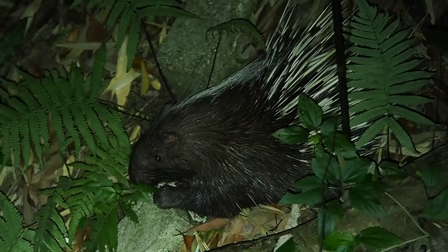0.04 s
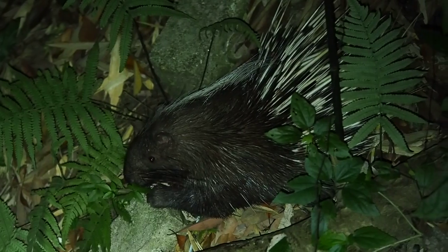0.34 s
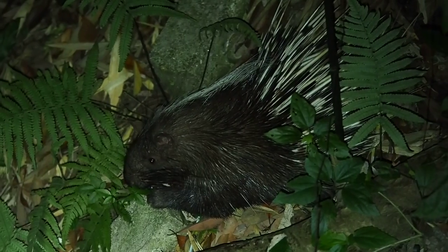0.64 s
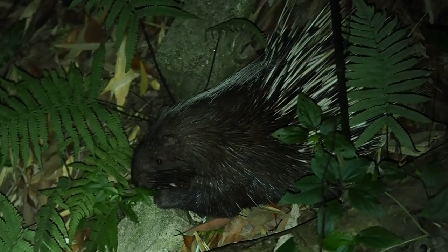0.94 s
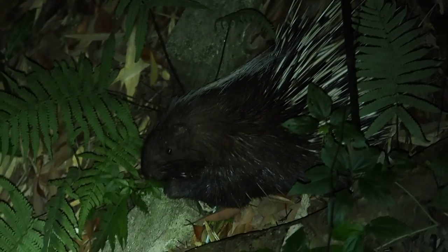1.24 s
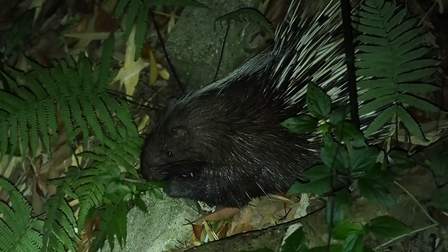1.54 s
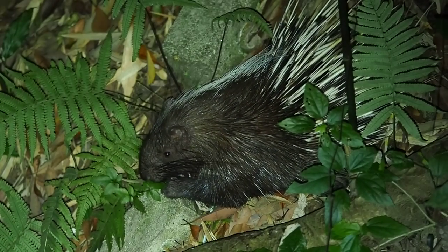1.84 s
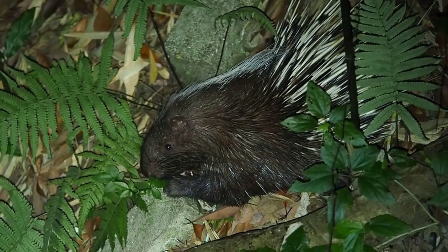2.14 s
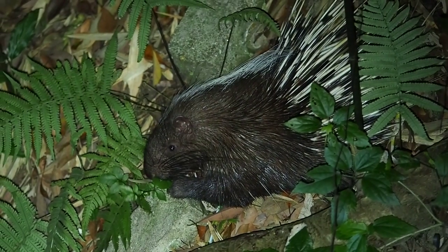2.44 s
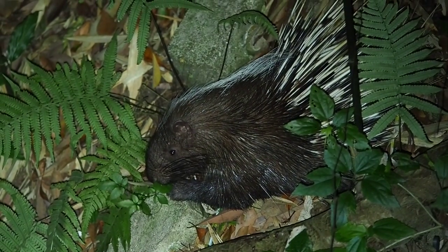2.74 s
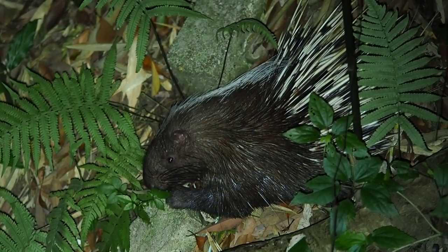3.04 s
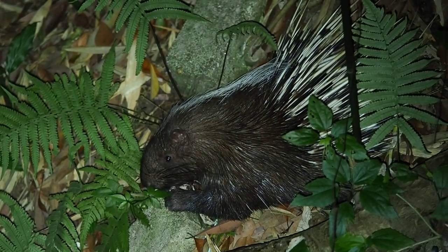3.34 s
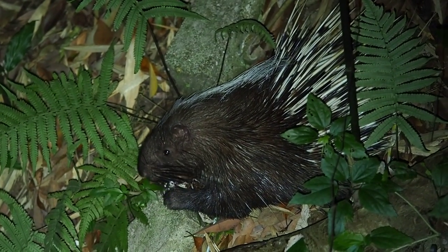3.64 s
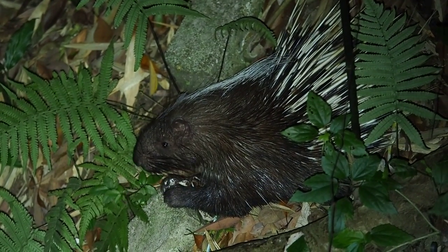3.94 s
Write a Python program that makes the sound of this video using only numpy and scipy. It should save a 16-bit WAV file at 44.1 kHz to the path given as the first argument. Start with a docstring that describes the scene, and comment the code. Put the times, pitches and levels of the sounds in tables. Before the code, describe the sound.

Faint crickets chirp throughout in a quiet night forest, over microphone hiss and a low distant rumble that fade in by half a second. A bush cricket rasps briefly at the start and again from about 2.3 to 3 seconds. At 1.6 seconds a porcupine feeding nearby makes one small dry snap. From around 2.5 seconds a thin insect trill rises and a far breeze swells softly.

```python
"""A low far-off rumble and a soft rush fade in over microphone hiss: a quiet forest at night.
A bush cricket rasps twice in quick scraping strokes above a thin insect chorus and one far trill.
Crickets chirp with pulsed wing strokes that echo off trunks and leaves.
One small dry snap, a few briefly ringing modes, comes from a porcupine feeding close by."""
import sys
import numpy as np
from scipy import signal
from scipy.fft import rfft, irfft
from scipy.io import wavfile

SR = 44100
rng = np.random.default_rng(int(sys.argv[2]) if len(sys.argv) > 2 else 0)


def to_wav(sig):
    """Store sig (one row per channel, or 1-D mono) as 16-bit WAV at the path in sys.argv[1].

    Samples outside -1..1 are clipped; the rate is SR.
    """
    pcm = np.clip(np.atleast_2d(sig), -1, 1) * 32767
    pcm = np.round(pcm).astype(np.int16)
    wavfile.write(sys.argv[1], SR, pcm.T)  # frames by channels


N = 176400
TIME = np.arange(N) / SR
FREQ = np.fft.rfftfreq(N, 1 / SR)


def amp(db):
    """Decibels to gain."""
    return 10 ** (np.asarray(db) / 20)


def unit(x):
    """Scale to rms 1."""
    return x / np.sqrt(np.mean(x ** 2) + 1e-30)


def spectrum(points):
    """Interpolate (frequency [Hz], value) on a log-frequency axis."""
    hz, value = np.transpose(points)
    return np.interp(np.log(FREQ + 1), np.log(hz + 1), value)


def envelope(points):
    """Gain over time from (time [s], level [dB])."""
    return amp(np.interp(TIME, *np.transpose(points)))


def drift(rate_hz):
    """Random wander below rate_hz, rms 1."""
    return unit(irfft(rfft(rng.standard_normal(N)) / (1 + (FREQ / rate_hz) ** 4), N))


def pan(right_db):
    """Stereo gains from right minus left level."""
    return amp(np.array([[-.5], [.5]]) * right_db)


def noise(shape, corr, right_db):
    """Shaped stereo noise with left-right correlation corr; rms 1 before panning."""
    left, independent = rfft(rng.standard_normal((2, N)))
    corr = np.clip(corr, -.99, .99)
    right = corr * left + np.sqrt(1 - corr ** 2) * independent
    return pan(right_db) * unit(irfft(np.array([left, right]) * shape, N))


def tones(rows, corr, right_db):
    """Wavering tones: narrow noise bands from (centre [Hz], width [Hz], level [dB])."""
    return sum(amp(db) * noise(1 / (1 + ((FREQ - hz) / width_hz) ** 2) ** 1.2, corr, right_db)
               for hz, width_hz, db in rows)


def add(mix, start_s, sound):
    """Mix in a stereo sound at start_s."""
    part = mix[:, max(round(start_s * SR), 0):][:, :sound.shape[1]]
    part += sound[:, :part.shape[1]]


def far_rumble():
    """Low noise, near mono in the bass, with a deep swell late on."""
    # (frequency [Hz], relative density [dB])
    rumble_spectrum = [(20, -15.5), (45, -8.5), (65, -7), (80, -0.5), (125, -4), (165, -2.5), (230, .5),
                       (295, -2), (360, 1), (420, -4), (570, -10), (800, -18), (2000, -32.5)]
    swell_spectrum = [(50, -20), (100, -2), (130, 0.5), (200, -0.5), (260, 1), (400, -4), (700, -40)]
    # (time [s], level [dB])
    swell_level = [(2.3, -80), (2.75, -70), (3.2, -65), (3.55, -74), (3.8, -68), (4, -62)]
    # (frequency [Hz], left-right correlation)
    correlation = [(30, 1), (100, 0.9), (200, 0.58), (340, .05), (500, 0.41), (900, 0.19)]
    corr = spectrum(correlation)
    steady = amp(-60 + .5 * drift(19)) * noise(amp(spectrum(rumble_spectrum)), corr, right_db=1.4)
    return steady + envelope(swell_level) * noise(amp(spectrum(swell_spectrum)), corr, right_db=0)


def far_rush():
    """Soft midrange noise with a brighter, fluttering swell, as of a far breeze."""
    # (frequency [Hz], relative density [dB])
    rush_spectrum = [(300, -8.5), (570, -5.5), (690, 2.5), (950, -0.5), (1250, -1), (1450, -4), (1700, -7),
                     (2050, -19.5), (3000, -18.5), (6000, -34)]
    swell_spectrum = [(500, -8), (850, -4), (1050, 6.5), (1300, -2.5), (1500, -10), (1750, 2),
                      (2050, -17.5), (2700, -7), (4000, -37.5)]
    # (time [s], level [dB])
    swell_level = [(2.4, -80), (2.85, -71), (3.12, -65), (3.4, -69), (3.6, -77), (3.85, -68.5), (4, -74)]
    steady = amp(-66 + .51 * drift(4.2)) * noise(amp(spectrum(rush_spectrum)), corr=.66, right_db=2.4)
    swell_gain = envelope(swell_level) * amp(1.4 * drift(27))
    return steady + swell_gain * noise(amp(spectrum(swell_spectrum)), corr=.75, right_db=-1)


def microphone_hiss():
    """Even, wide hiss, a little louder on the right."""
    # (frequency [Hz], relative density [dB])
    hiss_spectrum = [(500, -18), (2050, 1.5), (2550, 3), (3300, 2), (4200, 1.5), (5000, -2.5), (5450, -4.5),
                     (5700, -10.5), (6200, -8), (7300, -3.5), (9500, -4), (12500, -6), (15600, -8)]
    right_db = spectrum([(2000, 2.5), (3000, 4.2), (5000, 1.2), (7000, 1.1), (15000, .72)])
    corr = spectrum([(1500, -.11), (2300, -.36), (4500, -.062), (6000, -.15), (12000, -.069)])
    return amp(-66.5) * noise(amp(spectrum(hiss_spectrum)) * pan(right_db), corr, right_db=0)


def far_hums():
    """Faint low tones near the centre."""
    # (centre [Hz], width [Hz], level [dB])
    hums = [(126.5, 8, -73), (205, 10, -77), (760, 3.3, -81)]
    return tones(hums, corr=.93, right_db=-.8)


def thin_trill():
    """One far insect's narrow note comes and goes."""
    # (time [s], level [dB])
    trill_level = [(.3, -82), (1.4, -82), (1.9, -85), (2.3, -81), (2.6, -74), (3.1, -84), (3.35, -78),
                   (3.72, -76), (3.9, -88)]
    pitch_hz, width_hz = 4625, 60
    return envelope(trill_level) * tones([(pitch_hz, width_hz, 0)], corr=-.3, right_db=1)


def bush_crickets():
    """A far chorus, and one nearer insect scraping in quick uneven strokes."""
    # (frequency [Hz], relative density [dB])
    rasp_spectrum = [(3700, -65), (4200, -12), (4320, -6), (4380, -10.5), (4480, -6), (4630, -5),
                     (4770, -6), (4880, -15.5), (5300, -33)]
    # (time [s], level [dB])
    chorus_level = [(.5, -75), (1.3, -73), (1.9, -77.5), (2.3, -74), (3.2, -71), (3.7, -76.5), (3.95, -79)]
    # (start [s], release [s], level [dB])
    calls = [(.1, 0.41, -63.5), (2.337, 3.04, -63.5)]
    rise_s, decay_s, stroke_hz, stroke_depth = .06, .074, 85, .41
    shape = amp(spectrum(rasp_spectrum))
    chorus = envelope(chorus_level) * amp(.5 * drift(5.4)) * noise(shape, corr=-.28, right_db=.5)
    call_gain = np.zeros(N)
    for start_s, release_s, db in calls:
        attack = np.clip((TIME - start_s) / rise_s, 0, 1)
        decay = np.exp(-np.maximum(TIME - release_s, 0) / decay_s)
        call_gain += amp(db) * attack * decay
    rate_hz = stroke_hz * (1 + .11 * drift(12))
    strokes = unit(1 + stroke_depth * np.sin(2 * np.pi * np.cumsum(rate_hz) / SR))
    return chorus + call_gain * strokes * noise(shape, corr=-.73, right_db=1.5)


def forest_echoes(x):
    """Direct sound plus sparse echoes from trunks and leaves."""
    t60_s, wet = .6, amp(1)
    taps = rng.standard_normal((2, SR)) * (rng.random((2, SR)) < .05)
    taps *= amp(-60 * TIME[:SR] / t60_s)
    taps /= np.linalg.norm(taps, axis=1, keepdims=True)
    return (x + wet * signal.fftconvolve(x, taps, axes=1)[:, :N]) / np.hypot(1, wet)


def chirp(length_s, hz, db, right_db):
    """A run of wing strokes that swells and dies; each stroke sags in pitch."""
    stroke_hz, stroke_depth, sag_hz, jitter_hz = 41, .7, 55, 42
    t = np.arange(0, length_s, 1 / SR)
    stroke_phase = (stroke_hz * t + rng.random()) % 1
    pitch_hz = hz + sag_hz * (.5 - stroke_phase) + jitter_hz * drift(150)[:len(t)]
    swell = np.sqrt(abs(np.sin(np.pi * t / length_s)))
    strokes = 1 - stroke_depth * np.cos(2 * np.pi * stroke_phase)
    tone = np.sin(2 * np.pi * np.cumsum(pitch_hz) / SR)
    return amp(db) * pan(right_db) * unit(swell * strokes * tone)


def crickets():
    """Crickets chirp among the trees; far ones each hold a note."""
    # (start [s], length [s], pitch [Hz], level [dB], right minus left [dB])
    chirps = [(.34, 0.094, 5560, -77.5, 5), (0.477, .22, 5230, -77.5, 15), (0.501, 0.22, 5520, -75, 3),
              (1.07, 0.18, 5460, -78, 3), (1.40, .1, 5100, -87, 1), (1.632, 0.16, 5246, -70.5, 8),
              (2.228, 0.13, 5260, -75, -1), (2.39, 0.17, 5510, -78, 7), (2.88, 0.18, 5510, -76, 11),
              (2.948, 0.22, 5270, -74.5, 1), (3.722, .16, 5430, -81.5, 3), (3.82, 0.27, 5260, -80, 2)]
    # (centre [Hz], width [Hz], level [dB])
    far_notes = [(4490, 35, -83), (5030, 30, -90), (5260, 90, -85)]
    near = np.zeros((2, N))
    for start_s, *row in chirps:
        add(near, start_s, chirp(*row))
    return forest_echoes(near) + tones(far_notes, corr=-.16, right_db=8.5)


def porcupine_snap():
    """One dry feeding snap: fast-damped modes and close ground reflections."""
    # (frequency [Hz], relative level [dB], t60 [s])
    modes = [(820, -51, .012), (1200, -42.5, 0.0094), (1550, -51, 0.012), (2510, -55, 0.014),
             (3980, -46, 0.0036)]
    # (delay [s], left gain, right gain)
    reflections = [(.0026, 0.19, 0.054), (.0045, 0.099, -0.22)]
    start_s, gain_db, highpass_hz, lowpass_hz = 1.6325, 1, 550, 4400
    t = TIME[:SR // 10]
    ring = sum(amp(gain_db + db - 60 * t / t60_s) * -np.sin(2 * np.pi * hz * t)
               for hz, db, t60_s in modes)
    ring = signal.sosfilt(signal.butter(6, lowpass_hz, fs=SR, output="sos"), ring)
    ring = signal.sosfilt(signal.butter(1, highpass_hz, "high", fs=SR, output="sos"), ring)
    out = np.zeros((2, N))
    add(out, start_s, np.array([ring, ring]))
    for delay_s, left, right in reflections:
        add(out, start_s + delay_s, np.outer([left, right], ring))
    return out


def scene():
    """Night background, insects and the snap."""
    background = far_rumble() + far_rush() + microphone_hiss() + far_hums()
    return background + bush_crickets() + thin_trill() + crickets() + porcupine_snap()


def record(dry):
    """Small DC offset, opening silence, short fade-in, band limit."""
    dc_offset, silence_s, lowpass_hz = -.004, .155, 15740
    fade_in = envelope([(.23, -9.5), (.45, 0)]) * (TIME >= silence_s)
    lowpass = signal.firwin(2047, lowpass_hz, window=("kaiser", 9), fs=SR)
    return signal.oaconvolve((dry + dc_offset) * fade_in, lowpass[None], "same")


dry = scene()
out = record(dry)
to_wav(out)
```